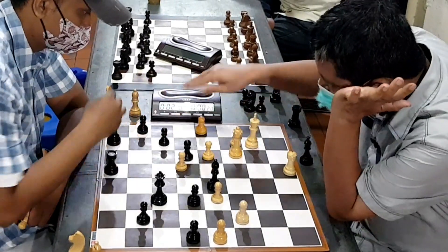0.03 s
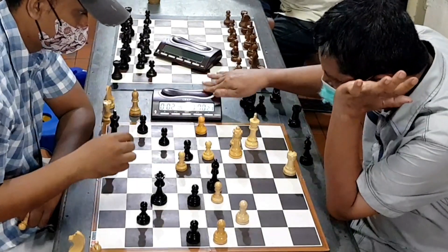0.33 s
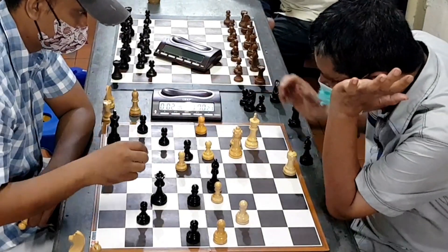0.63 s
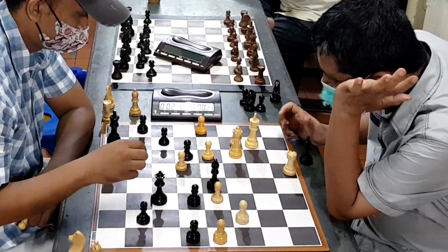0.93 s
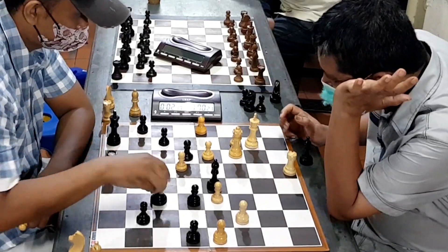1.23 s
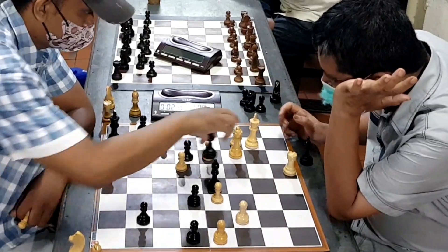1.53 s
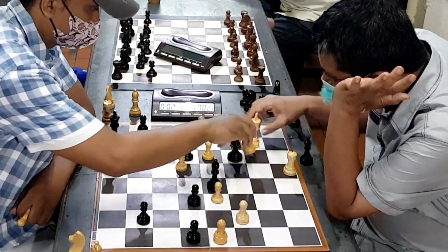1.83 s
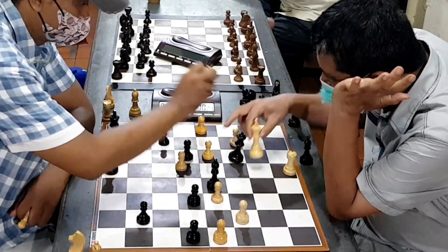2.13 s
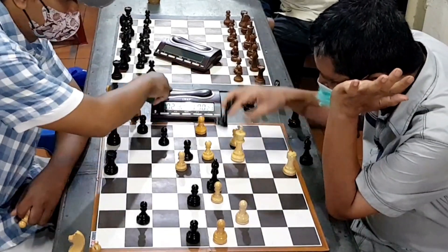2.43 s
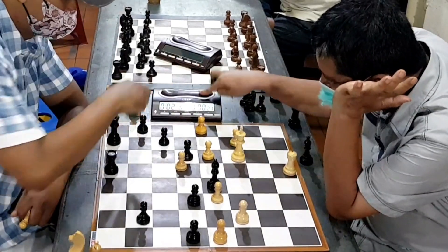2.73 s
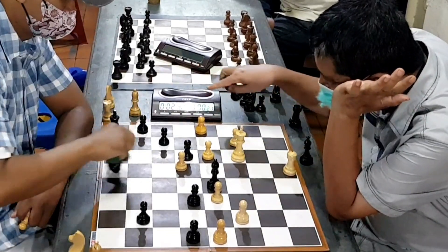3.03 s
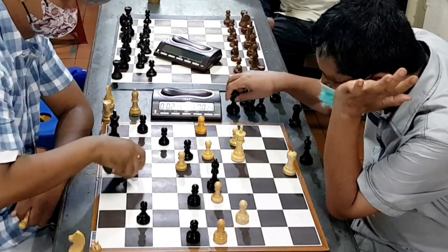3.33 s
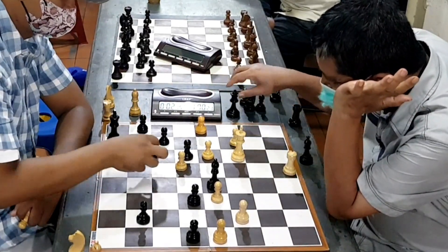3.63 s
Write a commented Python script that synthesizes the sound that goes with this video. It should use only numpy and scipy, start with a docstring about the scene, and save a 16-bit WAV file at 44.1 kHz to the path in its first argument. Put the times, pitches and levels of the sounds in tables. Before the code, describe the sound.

Chess pieces knock on a board while a plastic clock is slapped nearby, once at the start and twice later. Two pieces clink midway, and farther clocks clack through an echoing hall over low room noise.

```python
"""A felted chess piece knocks on its board, then a hand slaps a clock: blitz in a hard-walled hall.
The plastic clock's rocker cracks against its stop and rebounds; the case rings and drums the table top.
Pieces land edge first and rock flat, ringing the wood; two touch and clink. Clocks at farther tables
clack through the room, arms bump the table, and a low room noise lies under it all."""
import sys
import numpy as np
from scipy import signal
from scipy.fft import rfft, irfft
from scipy.io import wavfile
from scipy.ndimage import uniform_filter1d

SR = 44100
rng = np.random.default_rng(int(sys.argv[2]) if len(sys.argv) > 2 else 0)


def wrap_up_sound(samples):
    """Save the sound to the file named by the first command line argument, as 16-bit audio."""
    columns = np.atleast_2d(samples).T
    # keep every value between -1 and 1, then stretch to whole-number steps
    tamed = np.clip(columns, -1, 1)
    steps = np.round(tamed * 32767).astype(np.int16)
    wavfile.write(sys.argv[1], SR, steps)


N = 167580
T = np.arange(32768) / SR  # time axis of one event [s]

# hall decay (frequency [Hz], t60 [s])
HALL_DECAY = [(150, 0.67), (400, 0.4133), (1000, 0.353), (3000, 0.38), (7000, 0.38), (15000, 0.34)]
# spectra of hall tail and room noise (frequency [Hz], gain [dB])
HALL_SPECTRUM = [(100, -0.24), (400, 1), (1500, 1), (5000, -1.3), (15000, -1.1)]
NOISE_SPECTRUM = [(25, -20), (50, 1.5), (80, -2), (120, -2.5), (200, -8), (300, -6), (400, -7.5),
                  (600, -14.5), (1000, -23), (1570, -29), (2360, -29), (4380, -41.5), (7000, -48),
                  (10500, -47.5), (15500, -53)]
# stereo width of hall and cracks, and of room noise (frequency [Hz], side against mid [dB])
STEREO_WIDTH = [(100, 1.5), (300, -14), (700, -8), (1500, -2), (4000, -1), (12000, -0.5)]
NOISE_WIDTH = [(40, 1), (90, -10), (200, -8), (400, -11), (1000, -1), (4000, 0)]
# arms on the table (time [s], level [dB], frequency [Hz], t60 [s])
ARM_BUMPS = [(0.27, -9.5, 122, 0.064), (0.449, -7, 116, 0.028), (0.596, -11.5, 201, 0.028),
             (0.616, -18, 124, 0.048), (0.87, -12.5, 60.4, 0.032), (1.898, -26, 118, 0.11),
             (1.917, -26, 222, 0.038), (1.978, -29.5, 77, 0.19), (2.005, -16.5, 98, 0.037),
             (2.214, -23.5, 152, 0.066), (2.337, -22, 71.5, 0.13), (2.532, -18.5, 72, 0.061),
             (2.691, -25, 69.5, 0.13), (2.992, -23.5, 80.5, 0.14), (3.179, -23.5, 137, 0.11),
             (3.305, -17.5, 70, 0.057), (3.367, -28.5, 82.6, 0.056), (3.762, -37, 89, 0.17)]
# far clacks (time [s], level [dB], case ring [dB], crack body [dB], treble [dB], pitch ratio,
# left minus right [dB])
FAR_SLAPS = [(0.5099, 2.5, -1, -4, -2.5, 1.01, 0.5), (0.9525, -1, -2.5, -8.5, -1.5, 1, 0),
             (1.725, 2, -2, -2.5, -14, 0.98, 0.5), (1.8337, -3, 2, -0.5, 4.5, 1.04, 1),
             (2.4221, -4, -3.5, -3.5, -2, 1.01, 1), (3.483, 1.5, -5.5, 4, -1, 1.03, 0)]
# pieces set down, and one soft tick just before the last far clack (time [s], level [dB],
# contact corner [Hz], board boom [dB], room [dB], wood pitch ratio, first rocking interval [s],
# change per contact [dB])
KNOCKS = [(0.137, -7, 460, 7.5, -0.5, 1.01, .014, -8.5), (0.895, -10.5, 890, -4, -3.5, 1.06, 0.028, -7.5),
          (1.038, 0.5, 487, 2.5, -8.5, 0.93, 0.0092, -2), (1.329, -20.5, 616, 3, -9, 0.75, 0.015, -8),
          (1.499, -13.5, 870, -1, -6, 0.79, 0.019, -3.5), (1.728, -9.5, 342, 8.5, -16, 0.9, 0.035, -2.5),
          (2.2955, -8, 1940, -13, -12, 0.79, 0.0072, -1), (2.533, 5, 380, -6, -16, 0.73, 0.0028, -5.5),
          (3.064, -21, 630, 10.5, -5.5, 0.83, 0.0081, -7), (3.141, -10.5, 550, 6.5, -2.5, 1, 0.0068, -6.5),
          (3.2055, 0, 3620, -9.5, -11, 1, .0045, -7.5), (3.349, -18, 850, -4, -5.5, 0.98, .007, -2),
          (3.4773, -12.5, 1620, -2, -30, 0.94, 0.0058, -1.5), (3.666, -33, 380, -2, -25, 0.78, .015, -17.5)]
# near slaps (time [s], level [dB], table boom [dB], treble [dB], rebound [dB], rocker ring [Hz])
NEAR_SLAPS = [(0.2362, 1.5, -5.5, -8.5, -8, 2426), (2.4983, -4, -7, -11, 0, 2075),
              (2.8193, -1.5, 0, -8.5, 0.5, 2770)]
# contact spectra of far rockers, knocks and near rocker (frequency [Hz], gain [dB])
FAR_CRACK_SPECTRUM = [(100, -27.5), (450, 15.5), (1100, 1), (2100, 0.5), (3000, -3.5), (4600, -3.5),
                      (6000, -11), (10500, -10), (15000, -19.5)]
KNOCK_SPECTRUM = [(100, -17), (450, -41), (900, 10), (2600, 8), (4600, 1.5), (6500, -8), (15000, -7)]
NEAR_CRACK_SPECTRUM = [(100, -9), (350, 18), (780, 6.5), (1150, 3.5), (1800, 3), (2430, 2.5), (3400, -2),
                       (4300, 0.5), (4950, 0.5), (5500, -10), (8000, -8), (10500, -6), (15000, -15)]
# modes of the struck bodies (frequency [Hz], level [dB], t60 [s])
FAR_CASE_MODES = [(395, -5, 0.075), (528, 6.5, 0.033), (565, 3.5, 0.048), (943, -9, 0.053),
                  (1820, -7.5, 0.054), (2038, -3.5, 0.024)]
CLINK_MODES = [(3000, -0.5, 0.035), (3134, -2.5, 0.051), (3400, -7, .025), (4470, -7, 0.02),
               (4770, -6, 0.028), (8600, -20, 0.015)]
BOARD_MODES = [(198, -3, 0.073), (281.8, -0.5, 0.047), (376.7, -5.5, 0.062)]
WOOD_MODES = [(475, 1.5, 0.075), (595, -0.5, 0.08), (694, 3, 0.027), (807, 2, 0.034), (1154, 0.5, 0.03),
              (1600, -1, 0.011), (2050, -8, 0.039), (2580, -5, 0.044)]
TABLE_MODES = [(113, -16.5, 0.56), (264, 8, 0.18)]
NEAR_CASE_MODES = [(352.5, -10, 0.45), (412.6, -3, 0.18), (504, -9, 0.21), (562, -3, 0.19),
                   (760, -3, 0.029), (959, -12.5, 0.082), (1085, -12.5, 0.26), (1443, -13.5, 0.12),
                   (1925, -24, 0.043), (2510, -9.5, 0.062), (3014, -11.5, 0.07), (4220, -8, 0.03),
                   (4950, -6.5, 0.016)]


def undb(db):
    """Decibels to gain."""
    return 10 ** (np.asarray(db) / 20)


def at(points, hz):
    """Interpolate (Hz, value) points over log frequency."""
    points_hz, values = np.array(points, float).T
    return np.interp(np.log(hz + 1), np.log(points_hz), values)


def bins_hz(size):
    """FFT bin frequencies."""
    return np.fft.rfftfreq(size, 1 / SR)


def shape(x, db):
    """Minimum-phase filter from a gain per bin."""
    size = x.shape[-1]
    cepstrum = irfft(db * np.log(10) / 20, size)
    cepstrum[1:size // 2] *= 2
    cepstrum[size // 2 + 1:] = 0
    return irfft(rfft(x) * np.exp(rfft(cepstrum)), size)


def colour(x, points):
    """Filter by (Hz, dB) points."""
    return shape(x, at(points, bins_hz(x.shape[-1])))


def soften(x, corner_hz):
    """Two-pole low-pass: soft contact or dull wall."""
    return shape(x, -10 * np.log10(1 + (bins_hz(len(x)) / corner_hz) ** 4))


def brighten(x, db, corner_hz=3500):
    """Treble shelf."""
    hz = bins_hz(len(x))
    return shape(x, db * hz ** 2 / (hz ** 2 + corner_hz ** 2))


def fade(t60_s):
    """Exponential decay."""
    return np.exp(-np.log(1000) * T / t60_s)


def unit(x):
    """Scale to unit energy."""
    return x / np.sqrt(np.sum(x ** 2, axis=-1, keepdims=True))


def late(x, delay_s):
    """Fractional delay."""
    return np.interp(T - delay_s, T, x, left=0)


def stereo(pair, width):
    """Independent mid and side to left and right."""
    side = colour(pair[1], width)
    return np.array([pair[0] + side, pair[0] - side])


def through(x, paths):
    """Convolve with a left and a right path."""
    return signal.fftconvolve(paths, x[None])[:, :len(T)]


def add(out, time_s, x):
    """Mix in one event."""
    start = int(time_s * SR)
    out[:, start:start + len(T)] += x[..., :N - start]


def click(spectrum):
    """One contact: a filtered impulse."""
    return colour(signal.unit_impulse(len(T)), spectrum)


def ring(modes, pitch=1):
    """Struck modes; neighbours swing in opposite directions."""
    return sum((-1) ** k * undb(db) * fade(t60_s) * np.sin(2 * np.pi * hz * pitch * T)
               for k, (hz, db, t60_s) in enumerate(modes))


def crack(t60_s, side_db):
    """Dense, damped modes that spread a contact in time, differently left and right."""
    bursts = unit(rng.standard_normal((2, len(T))) * fade(t60_s))
    power = uniform_filter1d(abs(rfft(bursts)) ** 2, size=300)
    whitened = np.array([shape(burst, -10 * np.log10(p)) for burst, p in zip(bursts, power)])
    return stereo(whitened * undb([[0], [side_db]]), STEREO_WIDTH)


def case_ripple(x, depth_db, spacing_hz, above_hz=800):
    """A plastic case's small upper resonances: random peaks and dips."""
    hz = bins_hz(len(x))
    peaks = np.interp(hz / spacing_hz, np.arange(2000), rng.uniform(-1, 1, 2000))
    return shape(x, depth_db * peaks * hz ** 2 / (hz ** 2 + above_hz ** 2))


def hall(early_t60_s=0.2, early_db=1.5, build_s=0.01):
    """Room response: scatter off tables and players, then the diffuse tail."""
    noise = rfft(rng.standard_normal((2, len(T))))
    centres_hz = np.geomspace(100, 16000, 8)
    tail = 0
    for hz, weights in zip(centres_hz, np.eye(len(centres_hz))):
        band = at(list(zip(centres_hz, weights)), bins_hz(len(T)))
        tail += irfft(noise * band) * fade(at(HALL_DECAY, hz))
    tail = colour(unit(tail * (1 - np.exp(-T / build_s))), HALL_SPECTRUM)
    early = unit(rng.standard_normal((2, len(T))) * fade(early_t60_s))
    return stereo(tail + undb(early_db) * early, STEREO_WIDTH)


def in_room(body, room_db):
    """Direct sound, table-top reflection, one wall's dull echo and the hall."""
    table_echo = undb(-11) * late(body, delay_s=0.0095)
    wall = undb(-8) * late(soften(body, corner_hz=700), delay_s=0.043)
    return body + table_echo + wall + undb(room_db) * through(body, hall())


def room_noise(level_db=-40, waver_db=2, split_hz=344):
    """Wavering rumble under a steady hiss."""
    noise = colour(stereo(rng.standard_normal((2, N)), NOISE_WIDTH), NOISE_SPECTRUM)
    rumble = np.array([soften(channel, split_hz) for channel in noise])
    hiss = shape(noise, -10 * np.log10(1 + (split_hz / (bins_hz(N) + 1)) ** 2))
    waver = signal.resample(rng.uniform(-1, 1, 32), N)
    return undb(level_db) * (rumble * undb(waver_db * waver) + hiss) / noise.std()


def arm_bumps(rise_s=0.0045):
    """Arms thud on the table: one low mode each, soft onset."""
    out = np.zeros((2, N))
    for time_s, db, hz, t60_s in ARM_BUMPS:
        thud = ring([(hz, db, t60_s)]) * (1 - np.exp(-T / rise_s))
        add(out, time_s, in_room(thud, room_db=-7.5))
    return out


def far_clocks(crack_db=-7, ring_db=-22, swell_s=0.0048):
    """Clacks heard mostly through the hall; the ring swells as the table takes it up."""
    out = np.zeros((2, N))
    rocker = case_ripple(click(FAR_CRACK_SPECTRUM), depth_db=5, spacing_hz=71.1)
    swell = 1 - np.exp(-(T / swell_s) ** 2)
    for time_s, db, case_db, body_db, treble_db, pitch, pan_db in FAR_SLAPS:
        bass_shelved = undb(body_db) * brighten(rocker, -body_db, corner_hz=1000)
        tick = undb(crack_db) * brighten(bass_shelved, treble_db)
        snap = through(tick, crack(t60_s=0.11, side_db=-1) + undb(6) * hall())
        body = undb(ring_db + case_db) * ring(FAR_CASE_MODES, pitch) * swell
        gains = undb([[db + pan_db / 2], [db - pan_db / 2]])
        add(out, time_s, gains * (snap + in_room(body, room_db=-6)))
    return out


def clink(time_s=2.0185, tick_db=-25, ring_db=-39.5, chatter_s=0.0105, chatter_db=-7):
    """Two pieces touch in a capture and chatter once."""
    out = np.zeros((2, N))
    body = undb(ring_db) * ring(CLINK_MODES)
    for delay_s, db in ((0, 0), (chatter_s, chatter_db)):
        paths = crack(t60_s=0.021, side_db=1) + undb(-6) * hall()
        tick = undb(tick_db) * through(click(KNOCK_SPECTRUM), paths)
        add(out, time_s + delay_s, undb(db) * (tick + in_room(body, room_db=-3.5)))
    return out


def knocks(wood_db=-23, contact_cycles=0.92, rock_ratio=0.85):
    """Felted pieces land edge first, then rock flat ever faster; gentle contacts are duller, slower.
    Also plays the soft tick before the last far clack."""
    out = np.zeros((2, N))
    for time_s, db, contact_hz, boom_db, room_db, pitch, rock_s, rock_db in KNOCKS:
        tick = soften(click(KNOCK_SPECTRUM), contact_hz)
        wood = ring(WOOD_MODES, pitch) + undb(boom_db) * ring(BOARD_MODES)
        body = undb(wood_db) * soften(wood, contact_hz)
        swell = 1 - np.exp(-T * contact_hz / contact_cycles)
        tail = through(tick, undb(room_db) * hall()) + in_room(body, room_db)
        for k, delay_s in enumerate((0, rock_s, rock_s * (1 + rock_ratio))):
            knock = through(tick, crack(t60_s=0.005, side_db=-3)) + tail
            add(out, time_s + delay_s, undb(db + k * rock_db) * knock * swell)
    return out


def near_clock(crack_db=9, crack_t60_s=0.0085, ring_db=-19, side_db=-1):
    """A finger meets the rocker, which hits its stop and rebounds; the case drums the table."""
    finger_lead_s, finger_db = 0.0019, -20
    rocker_db, rocker_t60_s = -7, 0.055  # its pitch varies with the grip
    out = np.zeros((2, N))
    for time_s, db, boom_db, treble_db, rebound_db, rocker_hz in NEAR_SLAPS:
        contact = case_ripple(click(NEAR_CRACK_SPECTRUM), depth_db=1, spacing_hz=90)
        tick = undb(crack_db) * brighten(contact, treble_db)
        snap = through(tick, crack(crack_t60_s, side_db) + undb(-2) * hall())
        rattle = crack(t60_s=0.095, side_db=side_db)
        rebound = undb(rebound_db) * through(late(tick, delay_s=0.0031), rattle)
        rocker = ring([(rocker_hz, rocker_db, rocker_t60_s)])
        body = undb(ring_db) * (ring(NEAR_CASE_MODES) + rocker + undb(boom_db) * ring(TABLE_MODES))
        add(out, time_s, undb(db) * (snap + rebound + in_room(body, room_db=-10)))
        finger = through(tick, crack(crack_t60_s, side_db))
        add(out, time_s - finger_lead_s, undb(db + finger_db) * finger)
    return out


def scene():
    """Near game, far clocks and room."""
    return near_clock() + far_clocks() + knocks() + clink() + arm_bumps() + room_noise()


def record(dry, low_cut_hz=11, high_cut_hz=15500):
    """Two band-limited microphones, the right one brighter."""
    left = brighten(dry[0], db=2, corner_hz=8000)
    right = brighten(dry[1], db=6.5, corner_hz=8100)
    low_cut = signal.butter(2, low_cut_hz, "high", fs=SR, output="sos")
    high_cut = signal.ellip(8, .2, 80, high_cut_hz, fs=SR, output="sos")
    return signal.sosfilt(high_cut, signal.sosfilt(low_cut, np.array([left, right])))


dry = scene()
out = record(dry)
wrap_up_sound(out)
```